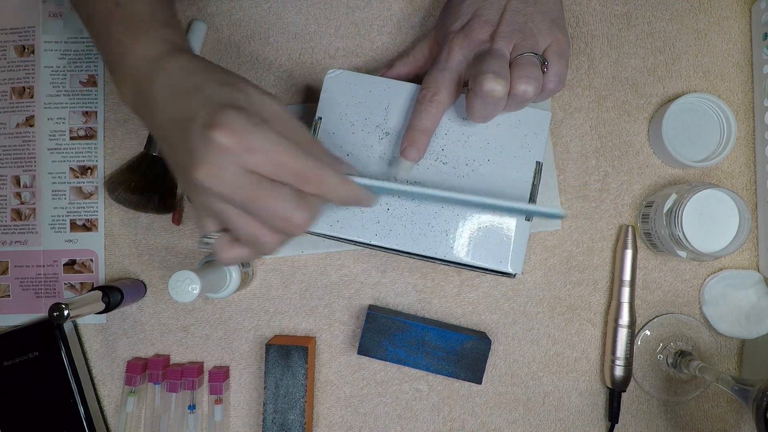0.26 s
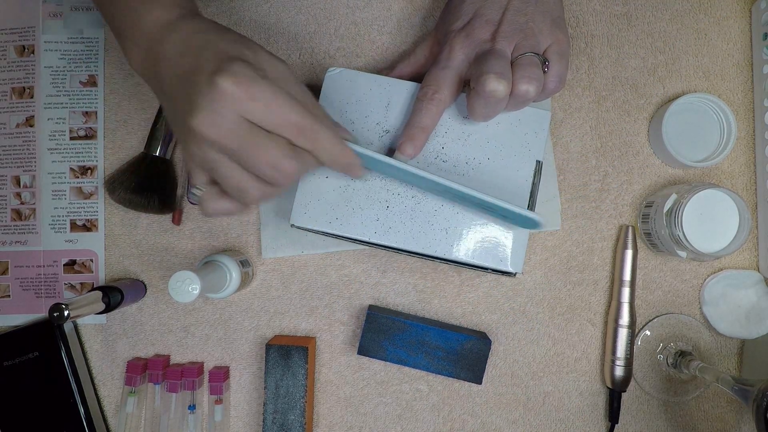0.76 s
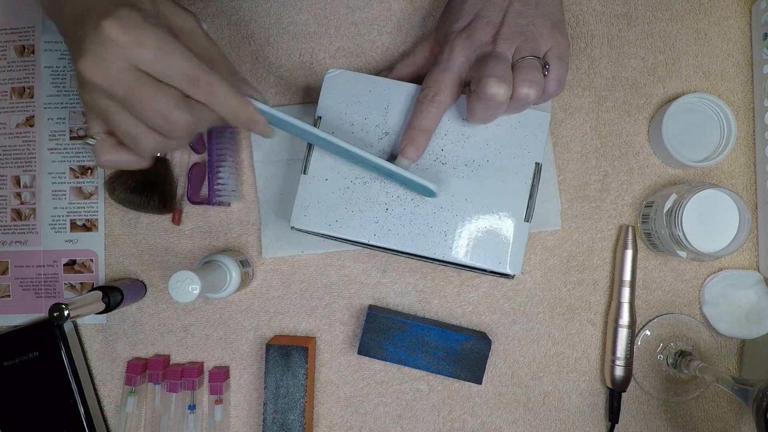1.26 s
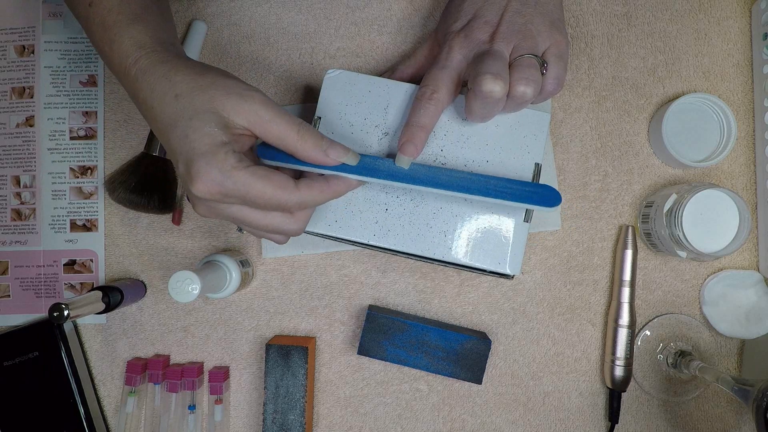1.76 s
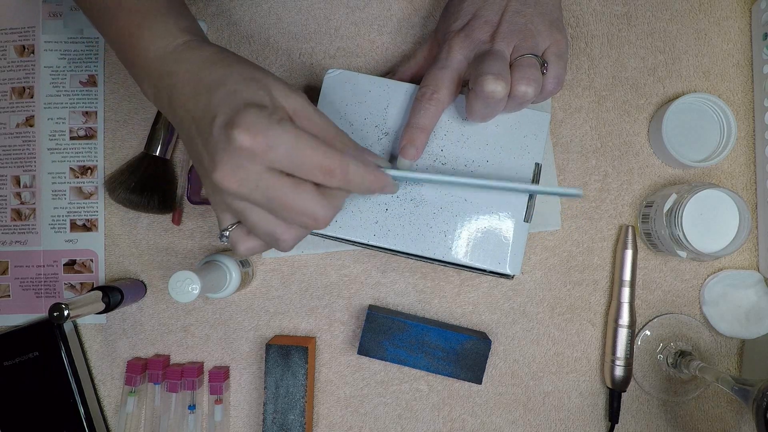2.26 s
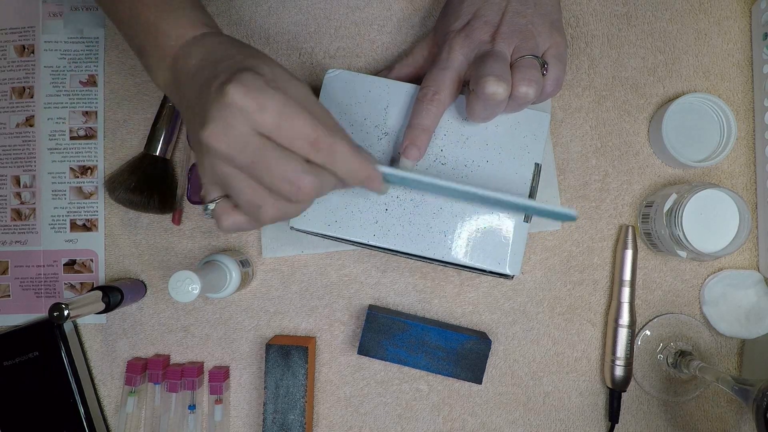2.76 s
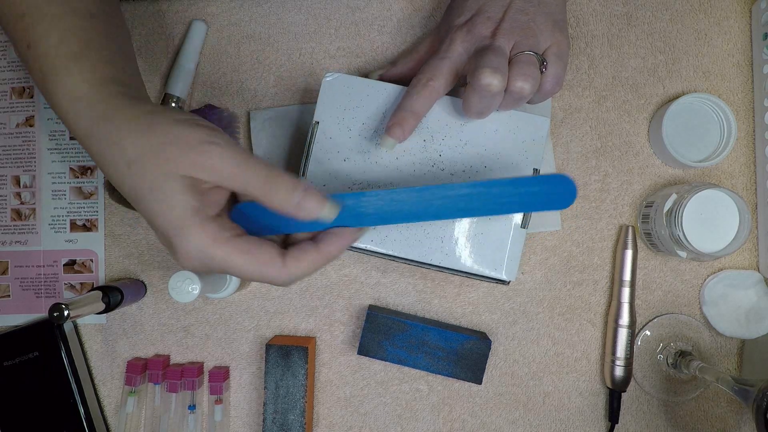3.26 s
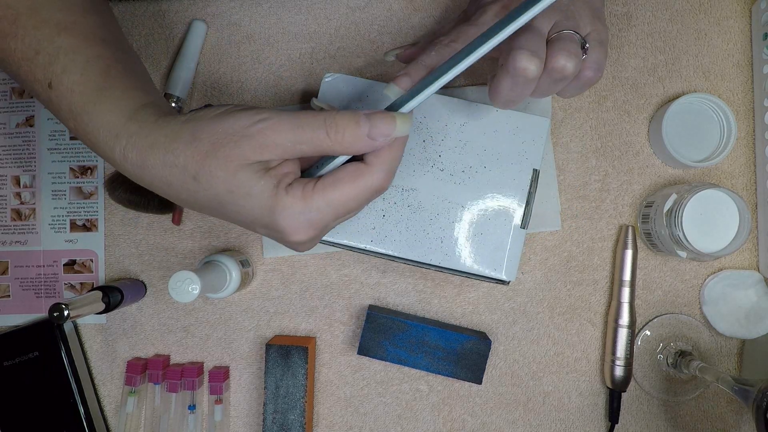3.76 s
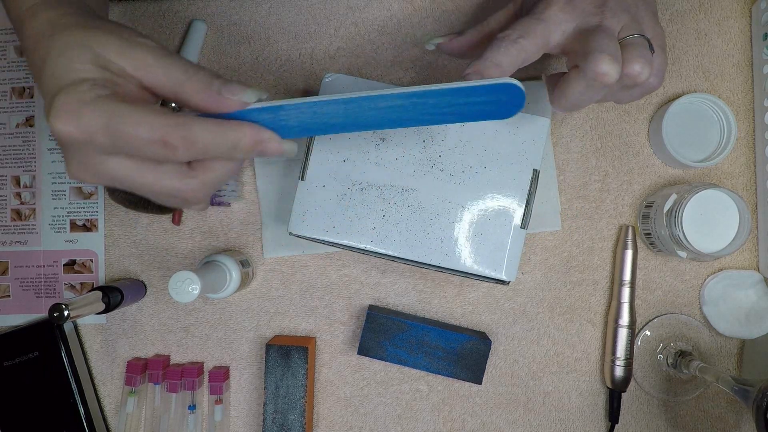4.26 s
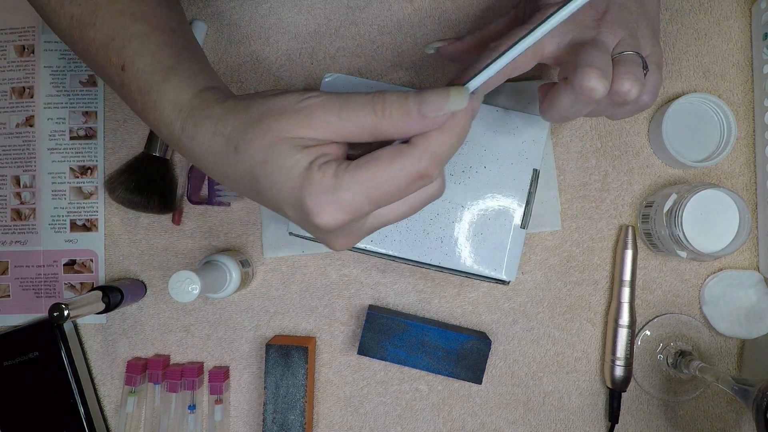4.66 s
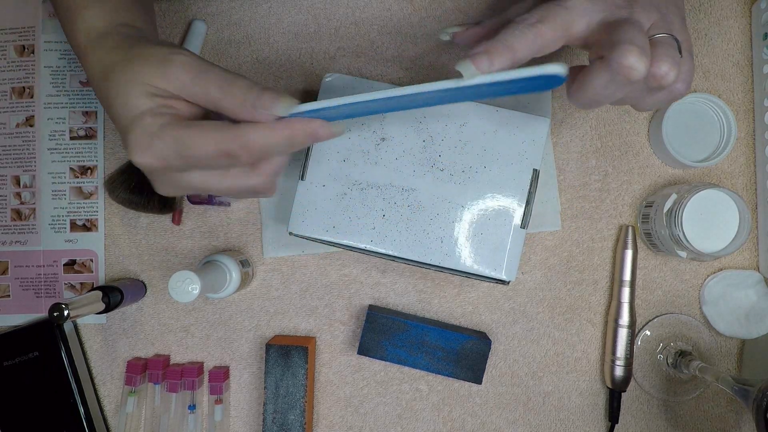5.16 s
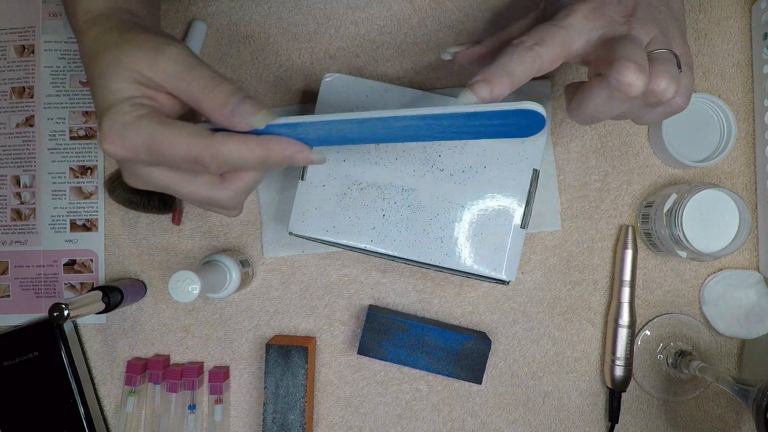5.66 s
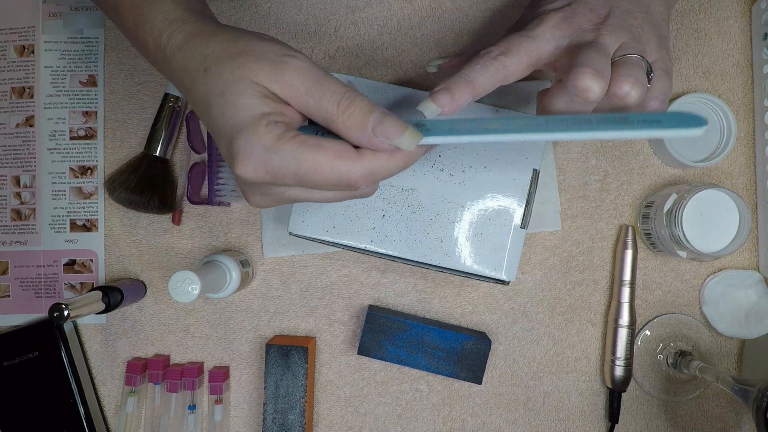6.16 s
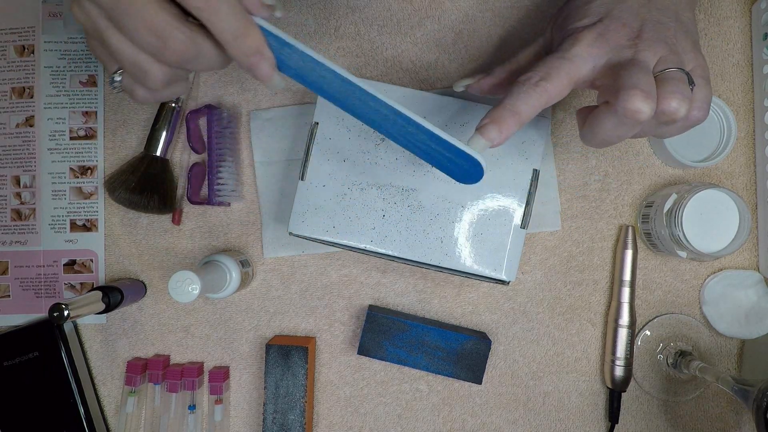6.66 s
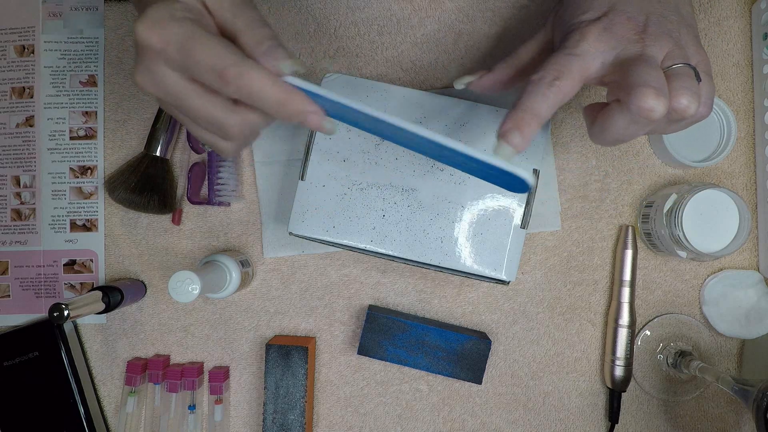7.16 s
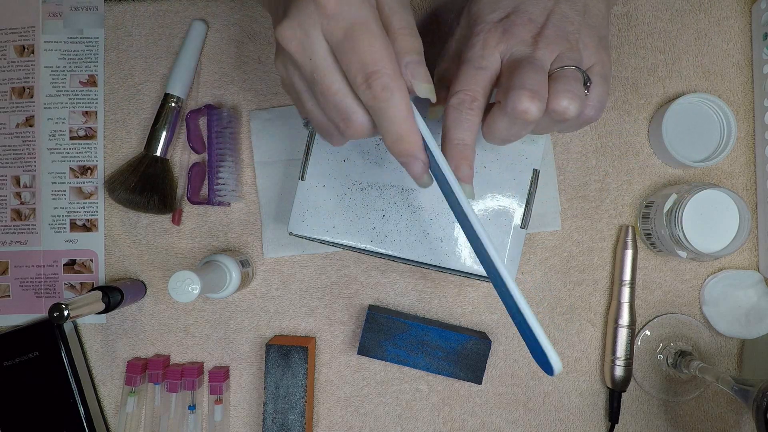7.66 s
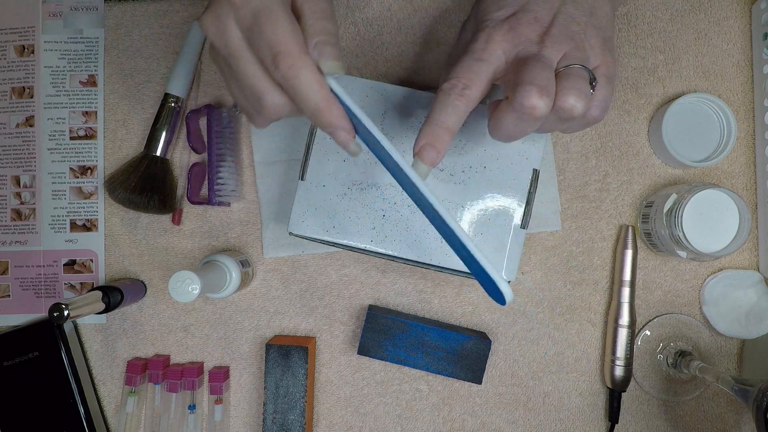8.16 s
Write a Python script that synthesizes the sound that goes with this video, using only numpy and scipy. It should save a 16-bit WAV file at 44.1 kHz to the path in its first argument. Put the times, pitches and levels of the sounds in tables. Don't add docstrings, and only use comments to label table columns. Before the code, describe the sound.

Dry, bright rasps of a nail file stroking a fingernail, with hollow boxy knocks early on, over a low hum in a quiet room.

```python
import sys
import numpy as np
from scipy import signal
from scipy.fft import rfft, irfft
from scipy.io import wavfile

SR = 44100
rng = np.random.default_rng(int(sys.argv[2]) if len(sys.argv) > 2 else 0)


def attenuation_scalar(level_db):
    decades = np.asarray(level_db, float) / 20
    return 10 ** decades


def transcribe(signal):
    frames = np.atleast_2d(signal).T
    limited = np.clip(frames, -1, 1)
    pcm = np.round(limited * 32767).astype(np.int16)
    wavfile.write(sys.argv[1], SR, pcm)


N = 370440

# [start/s, swell/s, contact/s, peak/dB, box rumble/dB]
BOX_STROKES = [
    (0.016, 0.0097, 0.016, -50.5, -36.5),
    (0.076, 0.064, 0.12, -37, -34),
    (0.455, 0.048, .12, -34, -34.5),
    (0.841, 0.054, .12, -35, -34),
    (1.24, 0.072, 0.15, -36, -34.5),
    (2.457, .13, 0.19, -41, -39.5),
    (2.923, 0.09, .112, -38.5, -40),
]
# [f/Hz, level/dB, time to fall 60 dB/s]
BOX_MODES = [(161, -6.5, 0.16), (205.7, -3.5, 0.27), (235, -25, 0.25), (293, -26, 0.11), (371.6, -13, 0.22),
             (540, -24, 0.14), (706, -21.5, 0.12), (1010, -21, 0.1)]
# [f/Hz, level/dB]
RASP_MID = [(2530, -77), (4300, -8), (4850, -5.5), (5800, 3), (7410, -1.5), (9680, -7), (11300, -19),
            (13700, -16), (15000, -25), (15800, -38)]
# [f/Hz, level/dB]
RASP_DIFFERENCE = [(2530, -76), (4300, -109), (5290, 6.5), (6910, 10), (8870, 9.5), (11300, 1),
                   (12100, -22), (13700, -2), (15500, -42), (15800, -79)]
# [f/Hz, level/dB]
FILE_BODY = [(260, -30.5), (450, 4), (745, -10), (849, -5), (1650, 1), (3150, 3.5), (4210, 5), (5000, -8),
             (6500, -71), (11000, -120)]


def rms_one(x):
    return x / np.sqrt(np.mean(x ** 2) + 1e-20)


def colour(x, spectrum, lifts=()):
    size = 4096
    hz = np.maximum(np.arange(size // 2 + 1) * SR / size, 1)
    table_hz, table_db = np.transpose(spectrum)
    db = np.interp(np.log(hz), np.log(table_hz), table_db)
    for centre_hz, width_hz, lift_db in lifts:
        db = db + lift_db / (1 + (2 * (hz - centre_hz) / width_hz) ** 2)
    cepstrum = irfft(np.maximum(db, -90) * np.log(10) / 20)
    cepstrum[1:size // 2] *= 2
    cepstrum[size // 2 + 1:] = 0
    response = rms_one(irfft(np.exp(rfft(cepstrum)))) / np.sqrt(size)
    return signal.oaconvolve(x, response)[:len(x)]


def drift(rate_hz):
    r = np.exp(-2 * np.pi * rate_hz / SR)
    noise = rng.standard_normal(N + SR)
    return rms_one(signal.lfilter([1], [1, -2 * r, r * r], noise)[SR:])


def grit(per_s, spread_db):
    sizes = attenuation_scalar(spread_db * np.minimum(rng.exponential(1, N), 5)) * rng.choice([-1, 1], N)
    return rms_one(sizes * (rng.random(N) < per_s / SR))


def ring(clicks, hz, t60):
    r = attenuation_scalar(-60 / (t60 * SR))
    w = 2 * np.pi * hz / SR
    return signal.lfilter([0, np.sin(w)], [1, -2 * r * np.cos(w), r * r], clicks + 1e-18)


def follow(x, pitch_hz, low_hz, high_hz, lift, count):
    out = x.copy()
    step = np.log(high_hz / low_hz) / (count - 1)
    for hz in np.geomspace(low_hz, high_hz, count):
        r = np.exp(-np.pi * hz * step / SR)
        poles = [1, -2 * r * np.cos(2 * np.pi * hz / SR), r * r]
        band = signal.lfilter([(1 - r * r) / 2, 0, (r * r - 1) / 2], poles, x)
        nearness = np.maximum(1 - np.abs(np.log(pitch_hz / hz)) / step, 0)
        out += lift * nearness * band
    return out


def walls(x, t60, wet_db):
    t = np.arange(SR // 4) / SR
    tail = rng.standard_normal((2, len(t))) * attenuation_scalar(-60 * t / t60) * (t > .004)
    echo = signal.oaconvolve(x, rms_one(tail) / np.sqrt(len(t)), axes=1)[:, :N]
    return x + attenuation_scalar(wet_db) * echo


def ears(mid, side, lean):
    # [f/Hz, level/dB]
    tilt = [(40, -9), (150, -10), (300, -13.5), (600, -11), (1200, -6.5), (4000, -9.5), (6000, -6),
            (9000, -13), (14000, -7)]
    hz, db = np.transpose(tilt)
    left = colour(mid + side, np.transpose([hz, lean * db / 2]))
    right = colour(mid - side, np.transpose([hz, -lean * db / 2]))
    return np.array([left, right])


def contact(*kinds):
    bite_s = .006
    body_holds = 0.51
    body_drops = 160
    t = np.arange(N) / SR
    out = np.zeros((4, N))
    out[0] = -150
    for kind, (rows, way, clear_s) in enumerate(kinds):
        bite_db, sag, fall, body_db = way
        for start_s, swell_s, contact_s, peak_db, last in rows:
            swell_s = max(swell_s, bite_s + .001)
            contact_s = max(contact_s, swell_s + .001)
            lift_db = peak_db - sag * (contact_s - swell_s)
            times = [0, bite_s, swell_s, contact_s, contact_s + 1]
            levels = [peak_db - bite_db - 7.5, peak_db - bite_db, peak_db, lift_db, lift_db - fall]
            db = np.interp(t - start_s, times, levels, -150, -150)
            clear = np.abs(t - start_s - contact_s - clear_s / 2) < clear_s / 2
            leads = (db > out[0]) | clear
            lifted_s = np.maximum(t[leads] - start_s - contact_s, 0)
            held_db = np.minimum(body_holds * (peak_db - db[leads]), 9)
            out[0, leads] = db[leads]
            out[1, leads] = body_db + held_db - body_drops * lifted_s
            out[2:, leads] = [[last], [kind]]
    return out


def room():
    # [f/Hz, level/dB]
    hum_colour = [(12, -51), (20, -16), (107, -31.5), (149, -6), (197, -10.5), (240, -3), (482, -12),
                  (524, -13.5), (733, -17), (1110, -19.5), (4500, -27.5), (4890, -29), (8790, -26.5),
                  (14100, -39.5), (15800, -49)]
    # [f/Hz, level/dB]
    murmur_colour = [(12, -67), (20, -21), (49, -17), (110, -40), (126, -9), (153, -1), (197, -8.5),
                     (254, 0), (292, 1), (345, 1), (891, 0.5), (2300, -17), (12000, -27.5), (14500, -35),
                     (15800, -83)]
    # [f/Hz, width/Hz, lift/dB]
    swellings = [(172.9, 60, 11.5), (215.4, 36, 4.5), (253.4, 24.4, 5), (6500, 900, 4)]
    hum = rms_one(colour(rng.standard_normal(N), hum_colour, swellings))
    murmur = rms_one(colour(rng.standard_normal(N), murmur_colour, swellings))
    return ears(hum * attenuation_scalar(-49.5 + 0.34 * drift(3.5)), murmur * attenuation_scalar(-48.5), lean=0.42)


def rumble():
    # [f/Hz, level/dB]
    box_colour = [(59, -45), (100, -53), (133, -25.5), (147, -2.5), (189, -6), (216, -0.5), (366, -8.5),
                  (420, -9), (548, -19), (601, -26), (677, -18.5), (791, -29.5), (900, -30.5), (1170, -44),
                  (1980, -120)]
    # [bite/dB, sag/(dB/s), fall/(dB/s), body/dB]
    shake_way = (1.5, 29, 186, 0)
    rows = [(s, .02, contact_s, db, 0) for s, swell_s, contact_s, peak_db, db in BOX_STROKES]
    level_db = contact((rows, shake_way, 0))[0]
    lifts = [(hz, 30, 4.0) for hz, db, t60 in BOX_MODES]
    shake = attenuation_scalar(np.minimum(level_db, -31) + 1.2 * drift(25))
    mid = shake * grit(1500, 1.9)
    side = shake * grit(2100, 2.4)
    return np.array([colour(mid, box_colour, lifts), attenuation_scalar(-15.0) * colour(side, box_colour, lifts)])


def knocks():
    # [t/s, peak/dB, tick against peak/dB, tick f/Hz, table boom/dB]
    knock_rows = [
        (0.078, -41.5, 6, 1640, 10),
        (0.406, -16, -14.5, 1640, 14.5),
        (0.787, -27.5, -19, 1020, 0),
        (1.175, -32, -10, 1050, -9),
        (1.586, -41, -20, 1000, 2),
        (2.082, -53, -12, 1000, -4),
        (2.254, -34, -14, 1290, 16),
        (3.047, -1, -13, 1180, 1.5),
        (5.544, -37.5, -2, 1000, -8),
    ]
    ring_db, ring_damping = -13, 0.51
    start_s, peaks_db, _, _, booms_db = np.transpose(knock_rows)
    at = np.round((start_s + 0.001404) * SR).astype(int)
    blow, tick = np.zeros((2, N))
    blow[at] = attenuation_scalar(peaks_db)
    for i, (s, peak_db, tick_db, hz, boom_db) in zip(at, knock_rows):
        touch = attenuation_scalar(peak_db + tick_db) * (np.arange(1024) == 0)
        tick[i:i + 1024] = ring(touch, hz, 0.0062) + 0.12 * ring(touch, 2380, 0.0052)
    lid = signal.butter(4, [200, 390], "band", fs=SR, output="sos")
    thump = attenuation_scalar(38) * signal.sosfilt(lid, blow + 1e-18)
    luck_db = rng.normal(0, 0.99, (len(at), len(BOX_MODES)))
    for k, (hz, level_db, t60) in enumerate(BOX_MODES):
        table_db = booms_db * (hz < 190)
        clicks = np.zeros(N)
        clicks[at] = attenuation_scalar((1.5 - ring_damping) * peaks_db + ring_db + level_db + luck_db[:, k] + table_db)
        swell = ring(clicks, hz, 0.054) * 2 * np.log(1000) / (.06 * SR)
        thump += ring(swell, hz, t60)
    thump = signal.sosfilt(signal.butter(5, 125, "high", fs=SR, output="sos"), thump)
    thump = np.array([thump, attenuation_scalar(-27) * np.roll(thump, 40)])
    return walls(thump, t60=0.34, wet_db=-7.5) - walls(tick * [[1], [.3]], t60=0.43, wet_db=-11.5)


def scuffs():
    # [t/s, peak/dB, centre f/Hz, length/ms, body against peak/dB]
    scuff_rows = [(0.013, -38, 5500, 6.6, -1), (0.0287, -13.5, 6860, 3, -20), (0.187, -32, 6500, 6.6, -1),
                  (0.616, -31.5, 6500, 8.5, -8), (0.248, -35, 7100, 12, -10), (0.408, -36, 3280, 9.8, 2.5),
                  (0.789, -32.5, 6760, 5, -15), (1.1776, -30, 6950, 4.5, -15), (1.776, -44, 6100, 13, -3),
                  (1.8277, -46, 6470, 14, -14), (2.2637, -28, 7140, 9.7, -11.5),
                  (2.387, -36.5, 7500, 8.2, -7), (3.2504, -34, 6850, 17, -9),
                  (3.5665, -29.5, 5950, 15, -24), (3.8287, -41, 7220, 11, -16),
                  (4.3803, -21, 6840, 4.3, -15), (4.684, -23, 5300, 12.3, -12.5),
                  (4.8105, -28, 5930, 10, -10), (5.343, -15.5, 6300, 18.7, -14.5),
                  (5.546, -38, 7550, 6.5, -1), (6.166, -35, 5700, 12, -5), (7.0843, -43, 6770, 10.5, -13),
                  (7.559, -40.5, 8140, 22, -9), (8.2682, -36.5, 6700, 16, -9)]
    out = np.zeros((2, N + SR))
    for s, peak_db, hz, length_ms, body_db in scuff_rows:
        progress = np.arange(2048) / SR / (np.clip(length_ms, 1, 40) / 1000)
        swell = np.sin(np.pi * np.minimum(progress, 1) ** 0.71)
        burst = rng.standard_normal((2, 2048)) * swell * attenuation_scalar(peak_db - 13.5)
        at = round((s - .003) * SR)
        out[0, at:at + 2048] += colour(burst[0], RASP_MID, [(hz, 1300, 10.5)])
        out[0, at:at + 2048] += attenuation_scalar(body_db) * colour(burst[0], FILE_BODY)
        out[1, at:at + 2048] += attenuation_scalar(-7.0) * colour(burst[1], RASP_DIFFERENCE, [(hz, 1300, 8)])
    return out[:, :N]


def strokes():
    # [start/s, swell/s, contact/s, peak/dB, sheen above 11 kHz against rasp/dB]
    air_strokes = [(3.262, 0.028, .045, -54.5, -16), (3.35, 0.009, 0.014, -40, -20.5),
                   (4.02, 0.023, .04, -49, -24), (4.045, 0.025, 0.3, -39.5, -17),
                   (4.23, 0.027, 0.099, -40, -17), (4.63, 0.0089, 0.14, -51, -19),
                   (4.972, 0.0092, 0.011, -47, -14), (5.056, 0.069, .27, -37.5, -19.5),
                   (5.561, 0.062, 0.089, -36, -22), (5.66, 0.018, 0.075, -40.5, -26),
                   (6.41, 0.036, 0.076, -47.5, -17), (6.47, 0.13, 0.25, -38.5, -29),
                   (6.925, 0.0077, 0.03, -52, -39), (7.102, 0.12, 0.17, -37.5, -34),
                   (7.685, .042, 0.041, -45.5, -24), (7.765, .06, .09, -45.5, -17),
                   (8.315, 0.055, .09, -47.5, -41)]
    # [start/s, swell/s, contact/s, peak/dB, sheen/dB]
    flicks = [
        (7.245, 0.019, 0.027, -32, -21),
        (7.845, 0.042, .058, -29.5, -18),
        (7.966, 0.011, 0.028, -32.5, -15),
    ]
    # [start/s, swell/s, contact/s, peak/dB, rasp f/Hz]
    rubs = [(1.545, 0.04, 0.039, -46, 7400), (3.03, .008, 0.019, -32.5, 5680),
            (3.065, 0.027, 0.032, -32.5, 6100), (3.105, 0.064, 0.084, -45, 6440),
            (3.452, .008, 0.07, -48, 5960), (3.55, 0.015, 0.019, -41, 6200), (3.59, .03, 0.041, -56, 6100),
            (3.738, .014, 0.015, -43.5, 5950), (3.79, 0.029, 0.049, -53, 6300),
            (3.9, 0.031, 0.06, -54, 6700), (5.358, .012, 0.071, -47, 6460),
            (5.823, 0.0075, 0.11, -51, 6800), (7.28, .008, 0.045, -49, 6500), (7.33, .1, .135, -54, 6100),
            (7.905, .008, 0.085, -41.5, 6600), (7.995, 0.0071, 0.059, -48, 6360)]
    # [t/s, rasp f/Hz, body f/Hz, flatness on the nail as body level/dB]
    grip = [(3.25, 6550, 3220, -4), (3.36, 5970, 3730, -15.5), (4.07, 6500, 4340, -11.5),
            (4.15, 6600, 4000, -8), (4.25, 6800, 2040, -8), (4.33, 6250, 2620, -12.5),
            (4.7, 6230, 4300, -10.5), (5.0, 6600, 2650, -11), (5.1, 6100, 3920, -12.5),
            (5.31, 6200, 3280, -16), (5.62, 6700, 3560, -12), (6.5, 6700, 3100, -12.5),
            (6.65, 7000, 3740, -14.5), (6.95, 6900, 2690, -11), (7.2, 6750, 3400, -13.5),
            (7.8, 6700, 2400, -12), (7.89, 6400, 3520, -15.5), (8.36, 6900, 2520, -7.5)]
    # [f/Hz, width/Hz, lift/dB]
    braced_modes = [(5700, 340, 2.5), (6670, 170, 9), (7680, 410, 7.5), (8900, 300, 4.5), (10100, 320, -1)]
    # [f/Hz, width/Hz, lift/dB]
    free_modes = [(1640, 900, 3.6), (4540, 420, 3.9), (5450, 270, 3.1), (6700, 1100, 3.9), (7550, 410, 6),
                  (8530, 420, 3.5)]

    rasp_db, body_db, last, kind = contact((BOX_STROKES, (4.5, 107, 321, -10.5), 0),
                                           (air_strokes, (7.8, 37, 260, 0.1), 0),
                                           (flicks, (14.4, 60, 1800, 0.1), .06),
                                           (rubs, (9.5, 77, 600, -18), 0))
    in_air = (kind == 1) | (kind == 2)
    light = kind == 3
    s, *columns = np.transpose(grip)
    rasp_hz, body_hz, flat_db = (in_air * np.interp(np.arange(N) / SR, s, c) for c in columns)
    rasp_hz = rasp_hz + light * last + 1 + 6150 * (kind == 0)
    rasp_hz = rasp_hz * (1 + .04 * drift(12))
    body_hz = body_hz + 1
    body_db = body_db + flat_db
    sheen_db = in_air * last

    level = attenuation_scalar(rasp_db + 1.11 * (drift(40) + 1.48 * drift(530)))
    last_start_s, _, last_contact_s, *_ = BOX_STROKES[-1]
    braced = np.arange(N) < (last_start_s + last_contact_s) * SR

    def sing(grains, shape):
        return np.where(braced, colour(grains, shape, braced_modes), colour(grains, shape, free_modes))

    mid = sing(grit(9000, 2.35) * level, RASP_MID)
    side = attenuation_scalar(-5.0) * sing(grit(9000, 1.0) * level, RASP_DIFFERENCE)
    focus = .9 + 2.2 * light
    trim = attenuation_scalar(-2.5 * in_air - 9.1 * light)
    rasp = np.array([follow(v + 1e-18, rasp_hz, 5620, 8200, lift=focus, count=8) * trim for v in (mid, side)])
    top = signal.sosfilt(signal.butter(3, 10500, "high", fs=SR, output="sos"), rasp)
    rasp += top * (attenuation_scalar(in_air * np.clip(sheen_db + 21.5, -15, 3.5) - 1.0 * light) - 1)

    body = colour(grit(9000, 2.06) * level * attenuation_scalar(body_db - 0.5 - 0.28 * in_air), FILE_BODY)
    body += in_air * attenuation_scalar(-26) * ring(body, 1870, 0.0032)
    rasp[0] += follow(body + 1e-18, body_hz, 1400, 4800, lift=1.3, count=8)
    return rasp


def scene():
    filing = walls(strokes() + scuffs(), t60=0.073, wet_db=-14.5)
    near = filing + knocks() + rumble()
    return ears(*near, lean=1) + room()


def band_limit(x):
    return signal.sosfilt(signal.butter(12, 15200, fs=SR, output="sos"), x)


def record(dry):
    over = np.abs(dry) - .7
    rounded = np.sign(dry) * (.7 + .25 * np.tanh(over / .25))
    mix = np.where(over < 0, dry, rounded)
    return band_limit(mix)


dry = scene()
out = record(dry)
transcribe(out)
```